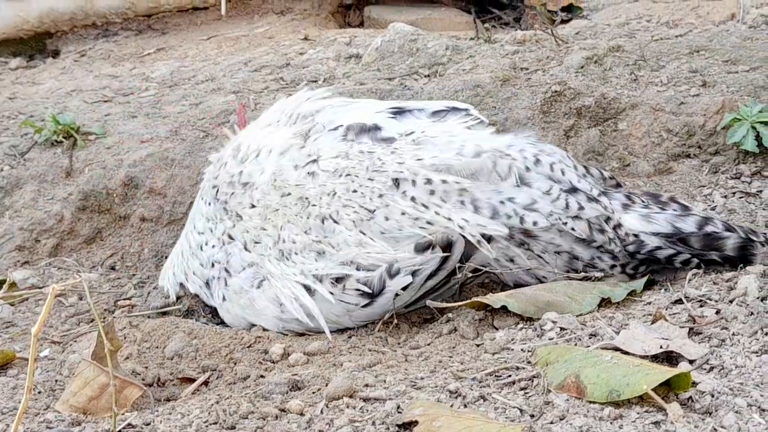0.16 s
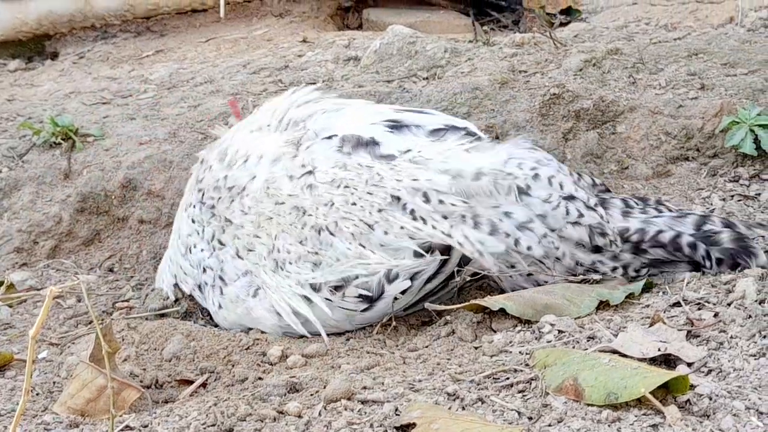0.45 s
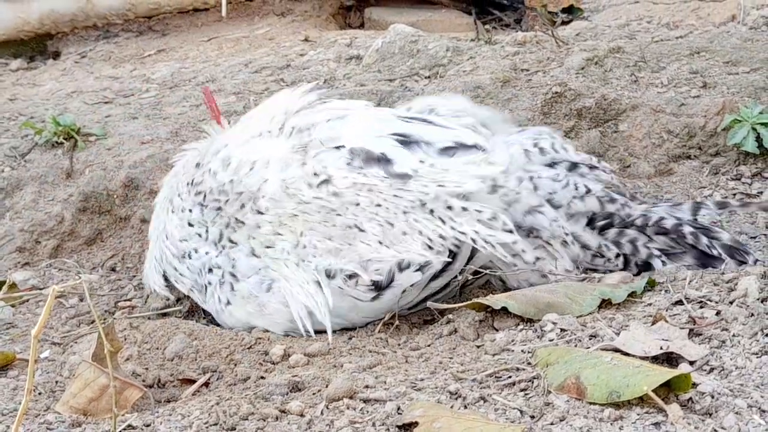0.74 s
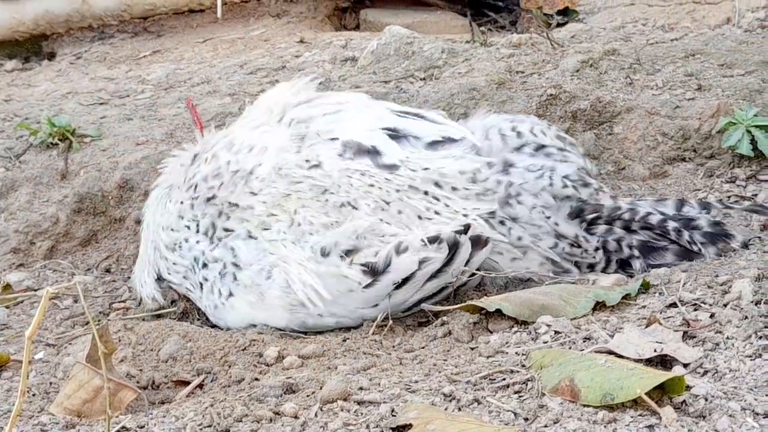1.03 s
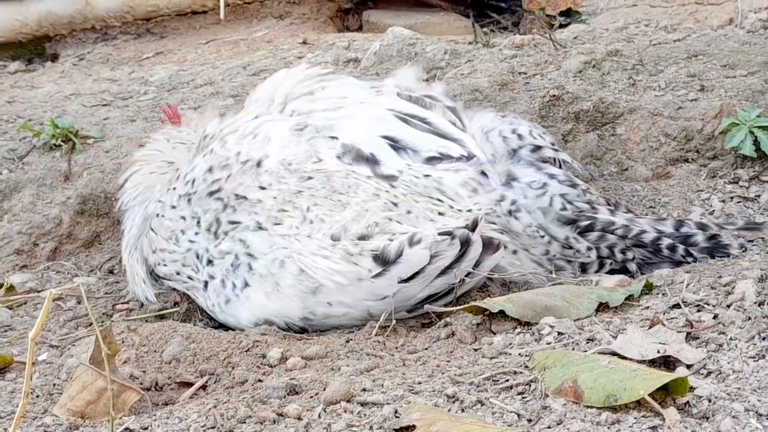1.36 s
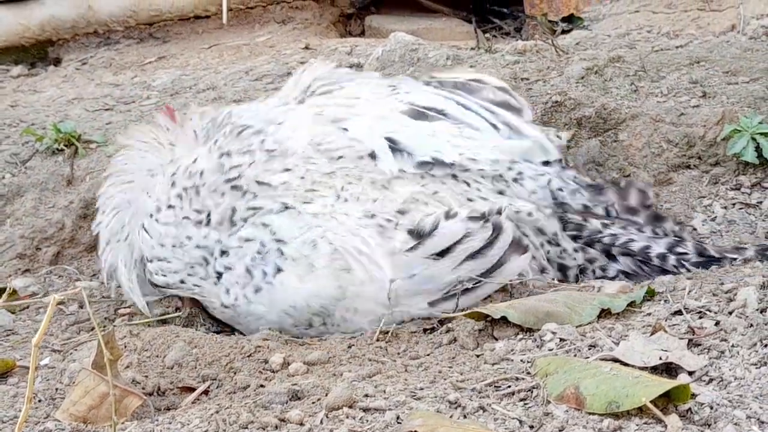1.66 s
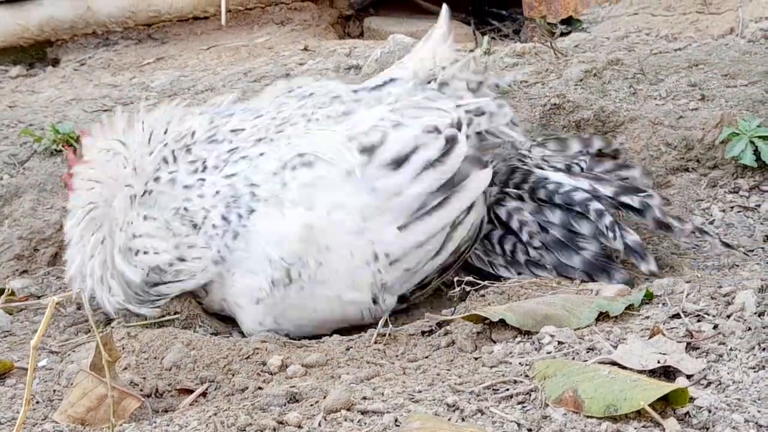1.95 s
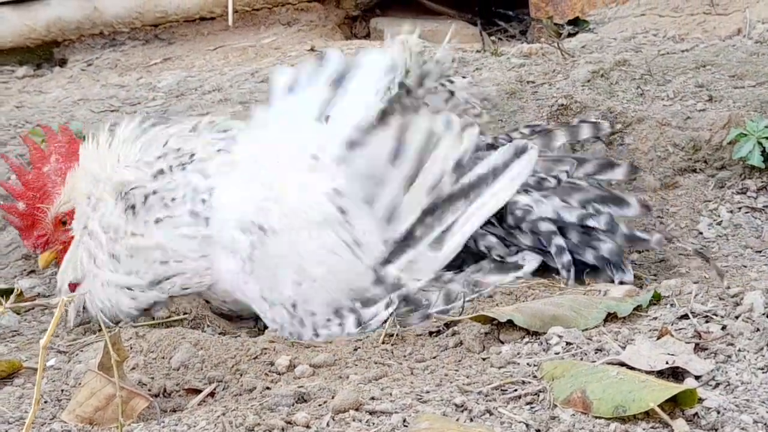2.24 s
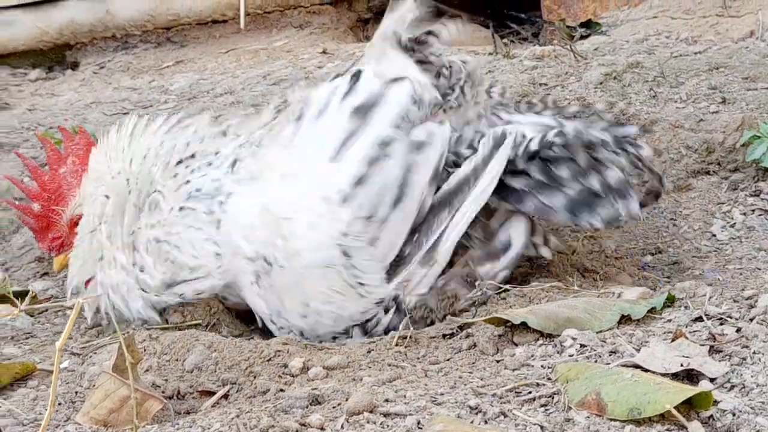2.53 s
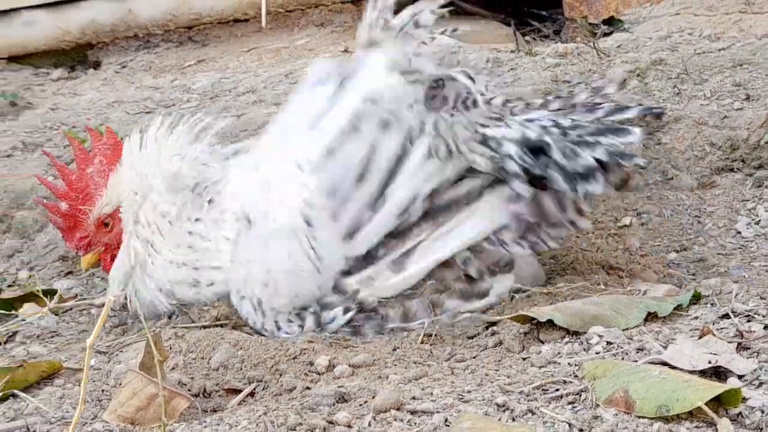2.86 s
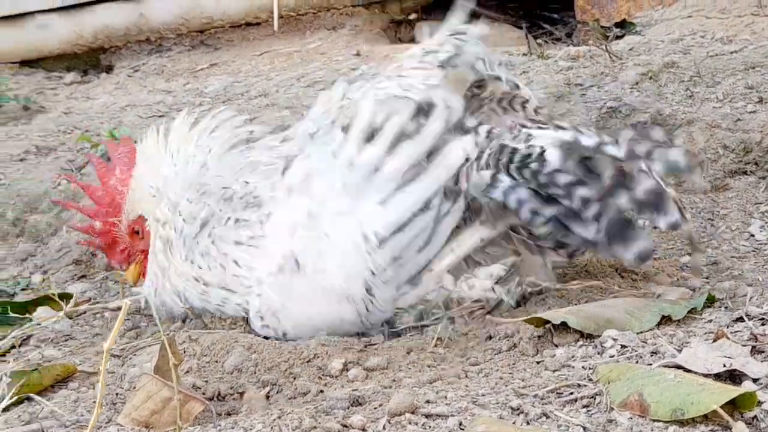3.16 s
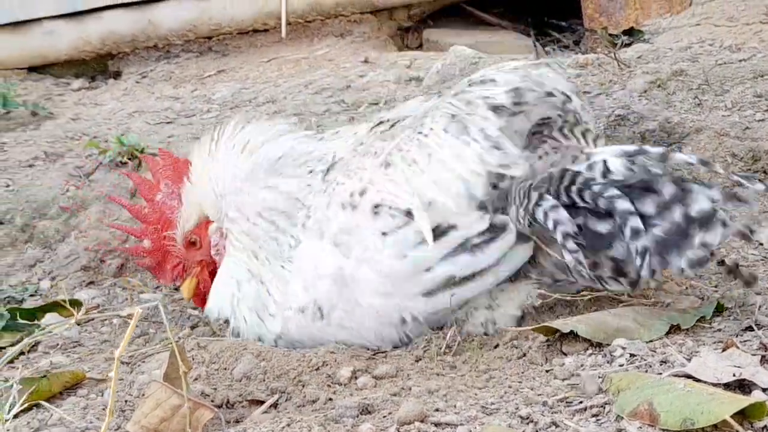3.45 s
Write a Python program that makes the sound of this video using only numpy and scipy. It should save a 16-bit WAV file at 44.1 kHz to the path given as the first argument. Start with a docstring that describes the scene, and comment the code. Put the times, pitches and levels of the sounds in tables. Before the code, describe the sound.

A rooster rustles and shakes its feathers in dry dirt while sparrows chirp.

```python
"""A rooster dust-bathes in dry dirt near a phone: feathers and sand rustle by friction, quills ring
as damped resonators, feet thud, grit ticks and the shaking wing thrums. To the right, sparrows
squabble in harsh two-voiced chirps, harmonic sources filtered by throat and beak; other birds whistle
or call sharply. Turbulent wind buffets the left microphone port over a quiet yard."""
import sys
import numpy as np
from scipy import signal
from scipy.fft import rfft, irfft, next_fast_len
from scipy.io import wavfile

SR = 44100
rng = np.random.default_rng(int(sys.argv[2]) if len(sys.argv) > 2 else 0)


def digitize_waveform(pressure):
    """Quantize a signal to 16-bit integers and store it at the path in sys.argv[1].

    Rows of a 2-D input are taken as channels; values are limited to [-1, 1].
    """
    field = np.atleast_2d(pressure).T
    bounded = np.clip(field, -1, 1)
    quanta = np.round(bounded * 32767).astype(np.int16)
    wavfile.write(sys.argv[1], SR, quanta)


N = 160965
ECHO_T60_S = .42
ROOSTER_PAN_DB = 4  # left minus right


def undb(db):
    """Amplitude ratio of a level in decibels."""
    return 10 ** (np.asarray(db) / 20)


def unit(x):
    """Normalisation to an RMS of 1."""
    return x / np.sqrt(np.mean(x ** 2))


def colour(x, spectrum, power=1):
    """Zero-phase filtering by a response (f/Hz, gain/dB) raised to a power."""
    size = next_fast_len(N + 8192)
    hz, db = np.array(spectrum).T
    log_f = np.log(np.fft.rfftfreq(size, 1 / SR) + 1)
    gain = undb(power * np.interp(log_f, np.log(hz), db))
    return irfft(rfft(x, size) * gain, size)[..., :N]


def wander(rate_hz, size=N):
    """Random modulation: low-passed noise with an RMS of 1."""
    lowpass = signal.butter(2, rate_hz, fs=SR, output="sos")
    return unit(signal.sosfilt(lowpass, rng.standard_normal(size + 4000))[4000:])


def envelope(table, column):
    """Amplitude envelope, linear in decibels between rows and silent outside them."""
    rows = np.array(table)
    return undb(np.interp(np.arange(N) / SR, rows[:, 0], rows[:, column], -120, -120))


def impulses(rows):
    """Ideal impacts: one impulse for each row (t/s, level/dB)."""
    x = np.zeros(N)
    for start, db in rows:
        x[int(start * SR)] += undb(db)
    return x


def ring(x, hz, width_hz):
    """Damped resonance: the wider the band, the faster the decay."""
    radius = np.exp(-np.pi * width_hz / SR)
    return signal.lfilter([.5, 0, -.5], [1, -2 * radius * np.cos(2 * np.pi * hz / SR), radius ** 2], x)


def diffuse_noise():
    """A diffuse field at two ports: alike in the bass, independent in the treble."""
    common, separate = rng.standard_normal(N), rng.standard_normal((2, N))
    lowpass = signal.butter(2, 826, fs=SR, output="sos")
    return separate + signal.sosfilt(lowpass, common - separate)


def place(x, pan_db, t60, echo_db, left_lag_s=0):
    """Superposition of direct sound and exponentially decaying scatter; positive pan is to the left."""
    t = np.arange(int(t60 * SR)) / SR
    tail = rng.standard_normal((2, SR))[:, :len(t)] * 1000. ** (-t / t60) * (t > .001)
    tail *= undb(echo_db) / np.sqrt(np.sum(tail ** 2, axis=1, keepdims=True))
    direct = np.array([np.roll(x, round(left_lag_s * SR)), x])
    echoes = signal.fftconvolve(x[None], tail, axes=1)[:, :N]
    return (direct + echoes) * undb([[pan_db / 2], [-pan_db / 2]])


def note(length, start_hz, bend_hz, end_hz, bend_at, curvature=1.6, attack=.3, release=.35):
    """Frequency and envelope of a glide: two power-law arcs meeting at a bend, with soft edges."""
    u = np.linspace(0, 1, int(length * SR))
    before = (start_hz - bend_hz) * np.abs(1 - u / bend_at) ** curvature
    after = (end_hz - bend_hz) * np.abs((u - bend_at) / (1 - bend_at)) ** curvature
    edge = np.minimum(np.minimum(u / attack, (1 - u) / release), 1)
    return bend_hz + np.where(u < bend_at, before, after), np.sin(np.pi / 2 * edge)


def phase_of(hz):
    """Phase as the time integral of frequency."""
    return 2 * np.pi * np.cumsum(hz) / SR


# Outdoor background spectrum: f/Hz, level/dB
YARD_SPECTRUM = [(32, -19), (55, -2.5), (145, -2), (275, 0.5), (393, -13.5), (1040, -21.5), (1310, -25.5),
                 (2320, -22), (2870, -23), (4000, -20.5), (6580, -31.5), (8300, -47.5), (9800, -32.5),
                 (13700, -38), (15800, -44)]


def yard(level_db=-55.5):
    """Distant outdoor sound forms a diffuse field that swells a little."""
    swell = undb(.7 * wander(2.5))
    return unit(colour(diffuse_noise(), YARD_SPECTRUM)) * undb(level_db) * swell


# Gusts: t/s, rumble level/dB, flutter level/dB
GUSTS = [(0.0, -83, -80), (0.13, -47, -59), (0.16, -63, -86), (0.23, -33.5, -37.5), (0.26, -48, -53),
         (0.56, -46.5, -48.5), (0.58, -56.5, -79), (0.74, -50, -64.5), (0.99, -45, -35), (1.03, -40, -45),
         (1.08, -37.5, -38), (1.14, -88, -55.5), (1.16, -54.5, -77), (1.32, -44, -45.5), (1.38, -70, -60),
         (1.43, -46.5, -55), (1.51, -48.5, -46.5), (1.55, -59, -81), (1.57, -66, -43), (1.66, -41, -49),
         (1.83, -62, -64.5), (1.92, -35.5, -45), (1.94, -42.5, -59), (2.04, -54.5, -58), (2.23, -57, -83.5),
         (2.3, -67, -81), (2.41, -45, -65), (2.49, -71, -66), (2.5, -45.5, -55), (2.8, -78, -80)]
# Spectra of the low rumble and the flutter above it: f/Hz, level/dB
RUMBLE_SPECTRUM = [(20, -50), (40, -9), (60, 2), (110, 2), (150, -7.5), (250, -56), (1500, -110)]
FLUTTER_SPECTRUM = [(80, -3), (130, -1), (200, -3.5), (300, -20.5), (500, -30), (1000, -51), (3000, -110)]


def wind(left_db=5, right_db=-11):
    """Turbulence makes low-frequency pressure fluctuations, strongest at the left port."""
    out = 0
    for column, spectrum in ((1, RUMBLE_SPECTRUM), (2, FLUTTER_SPECTRUM)):
        eddies = [rng.standard_normal(N) * undb(2 * wander(14.2)) for _ in range(2)]
        pressure = np.array([unit(colour(port, spectrum)) for port in eddies])
        out = out + pressure * envelope(GUSTS, column)
    return out * undb([[left_db], [right_db]])


def bird_voice(notes, beak, echo_db, warble=.066, buzz_depth=1.2, odd_db=-4):
    """Source and filter: harmonics, modulated in frequency and amplitude, pass through throat and beak."""
    out, jitter, buzz = np.zeros(N), wander(rate_hz=450), wander(rate_hz=350)
    beak_hz, beak_db = np.array(beak).T
    for k, (start, length, *pitches, bend_at, db, roughness) in enumerate(notes):
        hz, env = note(length, *pitches, np.clip(bend_at, .01, .99))
        own = slice(k * 4000, k * 4000 + len(hz))  # each note has its own stretch of modulation
        phase = phase_of(hz * (1 + warble * roughness * jitter[own]))
        tone = 0
        for h in range(1, 7):
            gain_db = np.interp(np.log(h * hz), np.log(beak_hz), beak_db) + odd_db * (h % 2)
            tone = tone + undb(gain_db) * np.sin(h * phase) * (h * hz < beak_hz[-1])
        tone *= 1 + buzz_depth * roughness * buzz[own]
        out[int(start * SR):][:len(hz)] += undb(db) * env * unit(tone)
    to_right = dict(pan_db=-3, left_lag_s=.00052)
    early = place(out, t60=.025, echo_db=[[7], [-5]], **to_right)  # more scatter at the left port
    late = place(out, t60=ECHO_T60_S, echo_db=echo_db + 6, **to_right)  # +6 offsets the halving
    return (early + late) / 2


# Sparrow notes: t/s, length/s, start f/Hz, bend f/Hz, end f/Hz, bend place (0-1), level/dB, roughness
SPARROW_NOTES = [(.048, 0.033, 1640, 2290, 2150, 0.9, -62, 0.6),
                 (.066, 0.041, 1680, 1790, 2260, 0.02, -53, 0.74),
                 (.075, 0.083, 2360, 2850, 2465, 0.03, -55, 0.69),
                 (.152, 0.08, 1894, 2140, 2023, 0.58, -49, 1.06),
                 (.184, 0.076, 2710, 2630, 2070, 0.15, -52.5, 0.4),
                 (.238, 0.057, 2030, 1902, 1886, 0, -55, 0.9),
                 (.244, 0.021, 2260, 2960, 2820, 0.45, -51, 0.65),
                 (.258, 0.039, 2650, 2640, 2040, 0, -55.5, .6),
                 (.288, 0.051, 2050, 2996, 2730, .33, -51, 0.48),
                 (.308, 0.027, 2210, 2180, 2200, 0.4, -53.5, 0.7),
                 (.324, 0.059, 1444, 1956, 1950, 1, -55, 0.37),
                 (.362, 0.067, 2835, 2893, 2420, .2, -58.5, 0.84),
                 (.366, 0.054, 1940, 2034, 1890, 0.7, -48.5, 1.06),
                 (.44, 0.0645, 1857, 1972, 1980, 0.58, -52, 0.83),
                 (.548, 0.052, 1807, 2190, 2150, 0.6, -49.5, .7),
                 (.546, 0.047, 2430, 2480, 3440, .05, -59, 0.65),
                 (1.248, 0.026, 1640, 1644, 2190, 0, -56, 0.15),
                 (1.256, 0.032, 2350, 2400, 3750, 0.6, -55, 0.8),
                 (1.275, 0.044, 1770, 1876, 1840, 0.03, -43.5, 0.55),
                 (1.27, 0.087, 2480, 2787, 2830, 0.44, -62, .5),
                 (1.308, 0.036, 2400, 2340, 1850, .1, -49.5, 1),
                 (1.361, 0.045, 1810, 1860, 2750, .06, -47.5, 0.34),
                 (1.385, 0.087, 1840, 2091, 1458, 0.38, -47, 0.71),
                 (1.608, 0.04, 2200, 2145, 1670, 0, -55.5, 1.21),
                 (1.661, .03, 2690, 2675, 2620, 0.9, -54, .5),
                 (1.664, 0.079, 1800, 1973, 1970, 0.59, -45, 0.94),
                 (1.69, 0.074, 2813, 2814, 2800, .6, -54.5, 0.77),
                 (1.715, 0.061, 2390, 2480, 1840, .1, -58, 0.7),
                 (1.779, 0.046, 1920, 1975, 2880, 0.15, -47, 0.65),
                 (1.802, 0.077, 2020, 2130, 1443, .4, -45, 0.54),
                 (1.915, 0.078, 1984, 2000, 1910, 0.56, -53, 0.94),
                 (1.936, 0.039, 1950, 2028, 2746, .05, -49, 0.77),
                 (1.96, 0.069, 2005, 2046, 1604, 0.41, -44, 0.72),
                 (2.355, 0.053, 1813, 1750, 2250, 0.58, -50, 0.75),
                 (3.282, 0.058, 1888, 1862, 1513, 0.49, -47, 0.74),
                 (3.268, 0.038, 2640, 2640, 2510, 0.46, -57, 1.07)]
# Response of throat and beak: f/Hz, gain/dB
SPARROW_BEAK = [(1400, -27), (2000, -5.5), (2400, -0.5), (3050, 3.5), (3700, 7.5), (4400, 10), (5600, 0.5),
                (7000, -13), (8300, -26.5), (11000, -7.5), (14000, -45)]


def sparrows():
    """Rapid modulation spreads each harmonic into a harsh band; overlapping notes give two voices."""
    return bird_voice(SPARROW_NOTES, SPARROW_BEAK, echo_db=-4)


# Whistles: t/s, length/s, start f/Hz, bend f/Hz, end f/Hz, bend place (0-1), level/dB, pan/dB
WHISTLE_NOTES = [(.861, .151, 1075, 1052, 1032, .51, -61, 0), (2.148, .072, 2230, 2380, 2680, .41, -53, 4),
                 (2.412, .058, 3100, 2740, 2560, .5, -49, 3), (2.456, .048, 2520, 2330, 2200, .5, -47, 3),
                 (2.453, .046, 3580, 4380, 3690, .5, -56, -3)]


def whistles():
    """Nearly sinusoidal oscillation: clear glides from birds farther off."""
    out, flutter, jitter = 0, undb(2.5 * wander(150)), wander(200)
    for start, length, *contour, db, pan_db in WHISTLE_NOTES:
        hz, env = note(length, *contour)
        tone, onset = np.zeros(N), int(start * SR)
        span = slice(onset, onset + len(hz))
        tone[span] = undb(db) * env * np.sin(phase_of(hz * (1 + .025 * jitter[span])))
        out = out + place(tone * flutter, pan_db, ECHO_T60_S, echo_db=-8)
    return out


# Strokes of feathers through sand: t/s, hiss level/dB, scrape level/dB
STROKES = [(1.9, -90, -73), (1.986, -62.5, -52), (2.284, -60, -53), (2.376, -57.5, -51.5),
           (2.502, -59, -62), (2.526, -58, -49.5), (2.708, -65, -62.5), (2.732, -53, -51),
           (2.78, -62.5, -53.5), (2.79, -62, -51), (2.804, -66.5, -54), (2.902, -54.5, -54.5),
           (2.94, -54, -49), (3.06, -54.5, -49.5), (3.148, -64, -60.5), (3.204, -61, -66),
           (3.254, -65.5, -57), (3.268, -61, -78), (3.316, -74, -53), (3.364, -66, -69),
           (3.384, -78, -61.5), (3.62, -77.5, -103), (3.63, -99, -89)]
# Spectra of the bright hiss and the dull scrape: f/Hz, level/dB
HISS_SPECTRUM = [(1200, -10.5), (2000, -10.5), (4000, 2.5), (6000, -6), (8000, -17.5), (10000, -3.5),
                 (12000, -19.5), (14200, -6.5), (15700, -75)]
SCRAPE_SPECTRUM = [(90, -5.5), (155, 4.5), (200, 3), (280, 2.5), (500, -5), (1000, -9.5), (1500, -18.5)]


def rustle(grains_per_s=3800):
    """Friction noise: tiny collisions of sand and feather modulate a hiss above a dull scrape."""
    hits = rng.random(N) < grains_per_s / SR
    strength = undb(4 * np.minimum(rng.exponential(size=N), 4))
    grains = signal.lfilter([1], [1, -.97], hits * strength)
    hiss = unit(colour(diffuse_noise() * (.5 + unit(grains)), HISS_SPECTRUM))
    hiss *= envelope(STROKES, column=1) * undb(7.5 + 4 * wander(15))
    scrape = unit(colour(diffuse_noise(), SCRAPE_SPECTRUM))
    scrape *= envelope(STROKES, column=2) * undb(3 + 1.3 * wander(33.5))
    return hiss * undb([[ROOSTER_PAN_DB / 2], [-ROOSTER_PAN_DB / 2]]) + scrape


def rattle_clicks(from_s=1.955, to_s=2.3413):
    """An impulse train that slows, grows and rises in pitch; rows are t/s, level/dB, tuning ratio."""
    from_last = np.arange(128.)
    growth = .97 ** from_last
    gaps = .005 + .0076 * growth + .0118 * .4 ** from_last  # the last gaps stretch quickly
    times = to_s - np.cumsum(gaps) + gaps * (1 + .03 * rng.standard_normal(128))
    levels = -45 + 5 * growth + 2 * rng.standard_normal(128)
    tunings = np.interp(times, [from_s, to_s], [.945, 1])
    return [row for row in zip(times, levels, tunings) if row[0] > from_s]


# Quill clicks as the wing shakes: t/s, level/dB
SHAKE_CLICKS = [(2.8331, -46), (2.8422, -43), (2.8552, -36.5), (2.8745, -33.5), (2.8933, -33.5),
                (2.9146, -36.5), (2.9308, -34.5), (2.951, -34.5), (2.9816, -33.5), (3.0089, -35),
                (3.029, -36), (3.064, -48), (3.0948, -38), (3.126, -46), (3.146, -51)]
# Quill modes: f/Hz, bandwidth/Hz, level/dB
QUILL_MODES = [(730, 250, -8), (1900, 150, 3), (2440, 160, -9), (3300, 220, -3), (4800, 300, 0),
               (7250, 350, -10), (10300, 1500, -18)]


def quills(fuzz_db=-25, fuzz_s=.012):
    """Impacts excite the damped modes of the quills: first a rattle, then the duller wing shake."""
    rattle = [(start, db, tuning, 0) for start, db, tuning in rattle_clicks()]
    shake = [(start, db, .965, -10) for start, db in SHAKE_CLICKS]
    t, out = np.arange(SR // 20) / SR, np.zeros(N)
    for start, db, tuning, treble_db in rattle + shake:
        kick = (t == 0) + undb(fuzz_db) * rng.standard_normal(len(t)) * np.exp(-t / fuzz_s)
        tuning *= 1 + .01 * rng.standard_normal()
        for hz, width_hz, mode_db in QUILL_MODES:
            gain = undb(db + mode_db + treble_db * (hz > 3000))
            out[int(start * SR):][:len(t)] += gain * ring(kick, hz * tuning, width_hz)
    return place(out, ROOSTER_PAN_DB, t60=.12, echo_db=-7, left_lag_s=.00038)


# Feet striking the dirt: t/s, level/dB
FOOTFALLS = [(2.446, -49), (2.52, -48), (2.527, -38.5), (2.579, -33), (2.73, -34), (2.763, -34),
             (2.789, -28.5), (3.051, -41), (3.226, -41), (3.32, -38)]


def thuds(hz=686, width_hz=530, gain_db=-20):
    """Heavy damping: a foot striking dirt gives a low resonance that dies at once."""
    knocks = ring(impulses(FOOTFALLS), hz, width_hz)
    return place(ring(knocks, hz, width_hz) * undb(gain_db), pan_db=0, t60=.03, echo_db=-8)


# Sharp calls: t/s, length/s, start f/Hz, bend f/Hz, end f/Hz, bend place (0-1), level/dB, roughness
NEAR_NOTES = [(2.611, 0.0356, 2656, 3040, 2710, 0.55, -41, 0.91),
              (2.69, 0.0385, 2926, 3085, 2765, 0.39, -40, 0.57)]
# Response of the nearer bird's beak: f/Hz, gain/dB
NEAR_BEAK = [(2000, -4), (3000, 5), (5900, 3), (9000, -14), (12000, -34), (14000, -50)]


def sharp_calls():
    """A nearer bird sounds drier: its ratio of direct to reverberant sound is higher."""
    return bird_voice(NEAR_NOTES, NEAR_BEAK, echo_db=-14)


# Single impacts of grit: t/s, level/dB
GRIT_HITS = [(2.7772, -40), (3.2271, -37), (3.3743, -33), (3.4879, -47)]


def grit(hz=4960, width_hz=3000):
    """Brief contact gives a broad spectrum: small grains strike with a high tick."""
    ticks = ring(impulses(GRIT_HITS), hz, width_hz)
    return place(ring(ticks, hz, width_hz), pan_db=0, t60=.015, echo_db=-6)


def wing_thrum(start_s=2.86, length_s=.28, pitch_hz=155, level_db=-51):
    """The shaking wing radiates a low tone, randomly modulated in frequency and amplitude."""
    hz, env = note(length_s, pitch_hz, pitch_hz, pitch_hz, bend_at=.5)
    hz *= 1 + .028 * wander(11, size=len(hz))
    tone = np.zeros(N)
    tone[int(start_s * SR):][:len(hz)] = env * np.sin(phase_of(hz))
    return tone * undb(level_db + 5 * wander(11))


def scene():
    """Linear superposition: the pressures of all sources add at each port."""
    return (yard() + wind() + sparrows() + whistles() + rustle() + quills()
            + thuds() + sharp_calls() + grit() + wing_thrum())


# Response of the left port relative to the right: f/Hz, gain/dB
PORT_DIFFERENCE = [(700, 0), (1300, 2), (2400, -3), (4400, -10), (8100, -7), (11000, 0), (15000, 8)]


def record(dry):
    """Frequency response: the two ports differ in colour, and a steep low-pass limits the band."""
    ports = np.array([colour(dry[0], PORT_DIFFERENCE, .5), colour(dry[1], PORT_DIFFERENCE, -.5)])
    return signal.sosfilt(signal.ellip(10, .2, 70, 15800, fs=SR, output="sos"), ports)


dry = scene()
out = record(dry)
digitize_waveform(out)
```